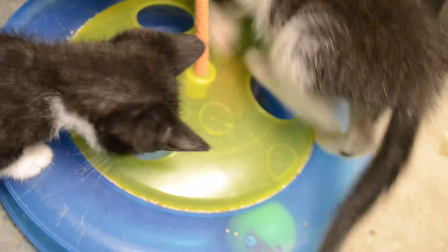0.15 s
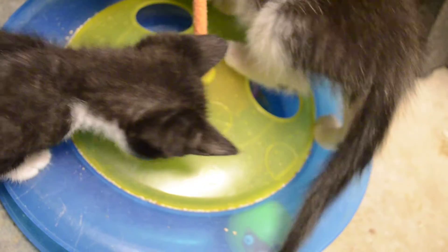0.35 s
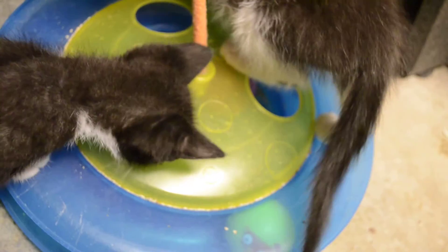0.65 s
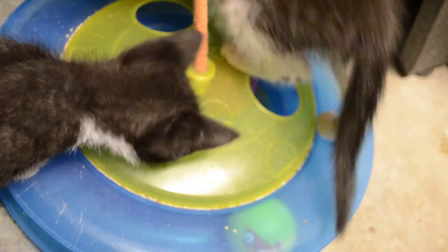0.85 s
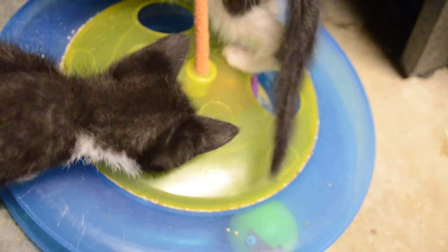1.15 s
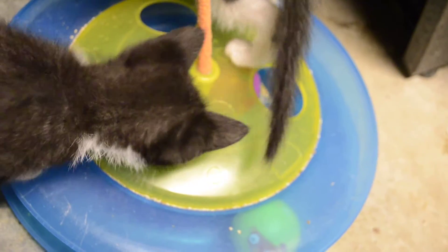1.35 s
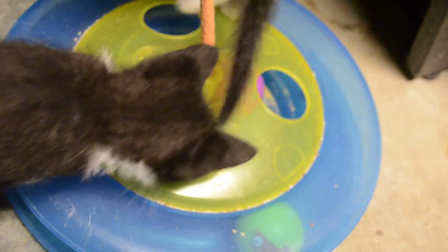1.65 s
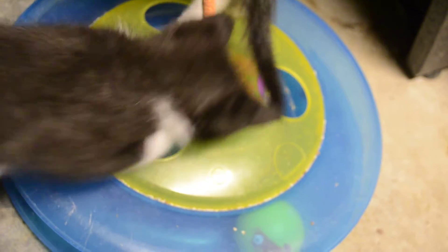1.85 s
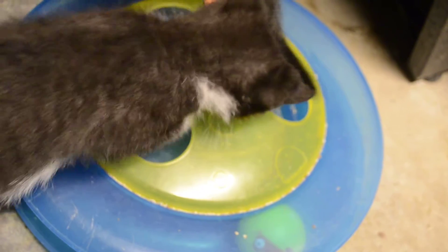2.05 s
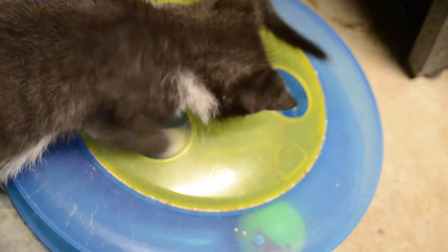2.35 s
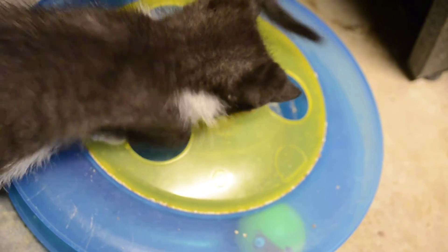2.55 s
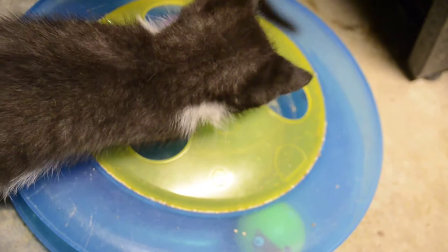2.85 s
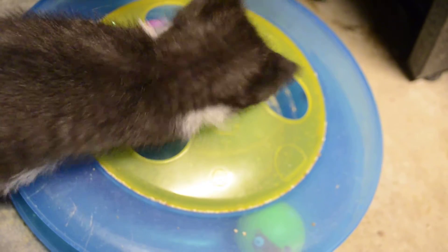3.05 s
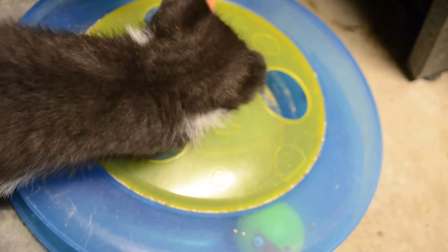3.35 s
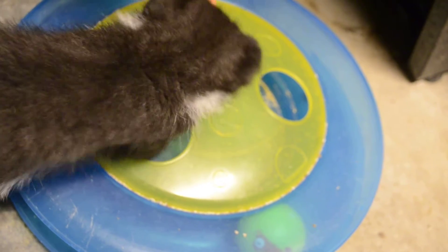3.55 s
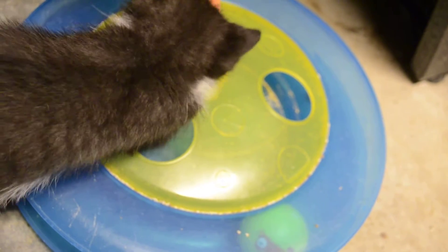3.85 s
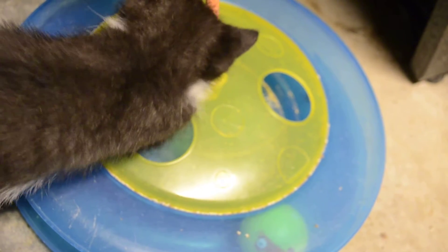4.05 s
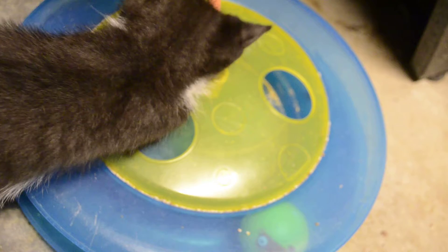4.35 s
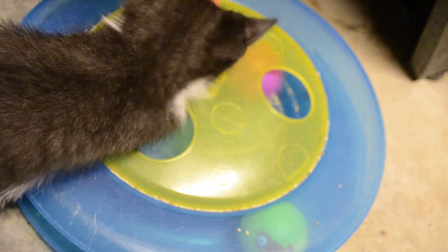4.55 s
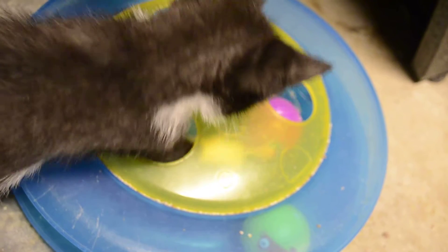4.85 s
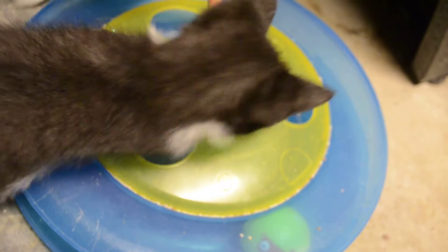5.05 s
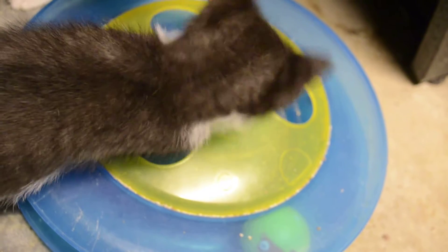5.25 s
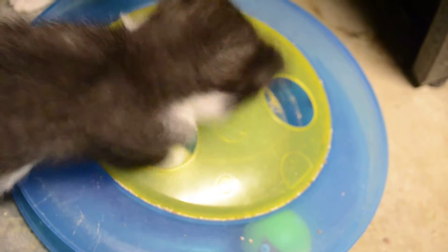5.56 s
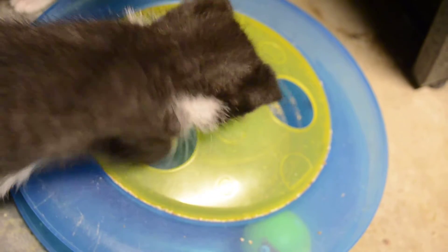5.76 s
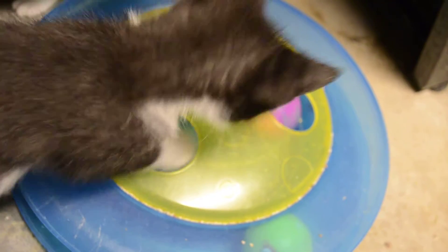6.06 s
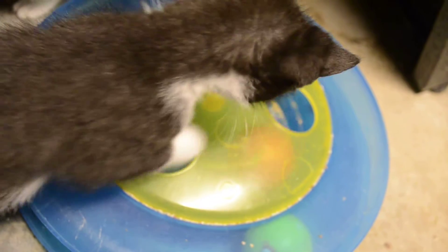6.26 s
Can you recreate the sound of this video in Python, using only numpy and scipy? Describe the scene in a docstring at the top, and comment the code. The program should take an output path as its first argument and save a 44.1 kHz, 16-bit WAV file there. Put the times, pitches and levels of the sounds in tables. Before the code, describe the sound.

A ventilation fan drones steadily throughout, a low hum with soft rushing air in a small room. Close to the microphone, a kitten plays with a ball in a hollow plastic toy. Only one faint tap comes at about 0.4 seconds, then nothing but the fan until light touches near 2.3 seconds. At 2.6 seconds a sharp, bright click and knock stand out, followed by smaller hollow knocks. From 3.2 to 4.1 seconds the ball knocks and chatters unevenly, with a few clicks and tiny judders. Softer taps and short rolls follow. At 5 seconds comes a loud, quick row of clicks and a brief judder as a paw pins the ball. It then rumbles along the track, tapping the walls, clatters again around 5.6 seconds, and rolls on more softly until about 6.4 seconds. Fur occasionally brushes the plastic very faintly.

```python
"""A ball knocks, chatters and rumbles round the track of a hollow plastic toy, batted by a kitten.
Each blow rings the toy's tray and lid; ribs in the track make the rumble, and the ball judders when a
paw pins it. Fur brushes the plastic, and sharp, bright clicks come singly or in quick rows. The toy lies
on the floor of a small room, heard close up on one microphone, with a ventilation fan droning below."""
import sys
import numpy as np
from scipy import signal
from scipy.fft import rfft, irfft
from scipy.io import wavfile

SR = 44100
rng = np.random.default_rng(int(sys.argv[2]) if len(sys.argv) > 2 else 0)


def unload_audio(sound):
    """Save the sound as a 16-bit wav file, at the path given as the first command line argument."""
    columns = np.transpose(np.atleast_2d(sound))
    # keep every value between -1 and 1, then stretch to whole-number steps
    steps = np.round(np.clip(columns, -1, 1) * 32767)
    wavfile.write(sys.argv[1], SR, steps.astype(np.int16))


N = 282844
TIME = np.arange(N) / SR

# Spectrum of the fan's rushing air. Each row: frequency in Hz, relative level in dB.
FAN_AIR = [(25, -36), (42, -23), (58, -10.5), (100, -3.5), (132, -18), (170, -5), (290, -8), (400, -14.5),
           (640, -17.5), (1250, -22.5), (2100, -32), (4000, -44.5), (7500, -61.5), (13000, -69),
           (16000, -65)]
# The fan's drone and faint whistles. Each row: centre in Hz, width in Hz, level in dB.
FAN_TONES = [(91.4, 1.6, -48.5), (205.14, 3.8, -44.5), (234, 6.1, -77), (859.5, 16.6, -53), (944, 4, -60),
             (9850, 650, -87.5), (11770, 620, -84)]
# Fur and paws on the plastic. Each row: middle in seconds, level in dB, half length in seconds.
FUR_BRUSHES = [(2.43, -77, .04), (2.565, -66.5, 0.027), (2.94, -69, 0.018), (3.777, -69, 0.058),
               (4.12, -74, 0.13), (4.992, -66.5, 0.057), (5.598, -67.5, .03), (5.874, -76, .03),
               (6.121, -69, .025)]
# Sharp, bright clicks. Each row: start in seconds, energy per click in dB, burst length in seconds.
SHARP_CLICKS = [(2.268, -41, .006), (2.547, -36, 0), (2.606, -12.5, 0), (2.857, -43, 0),
                (3.4872, -25.5, 0.0036), (3.538, -34, 0), (3.764, -38, 0), (5.021, -22.5, .014),
                (5.597, -25, 0), (5.687, -35, 0), (5.841, -33, 0)]
# Modes of the toy, from hollow tray through lid to stiff rim.
# Each row: frequency in Hz, relative level in dB, time to die away by 60 dB in seconds.
TOY_MODES = [(320, -4, 0.37), (373.6, -2, 0.47), (457.7, 1, 0.17), (499, -2.5, 0.18), (616, 1, 0.018),
             (618.2, 0.5, 0.088), (694, 4, 0.066), (777, 7.5, 0.054), (908, -0.5, 0.11),
             (1005.7, -2, 0.068), (1065.5, -0.5, 0.056), (1130.6, -10, 0.13), (1250, -9.5, 0.14),
             (1440, -16, 0.22), (1462, 0.5, 0.085), (1743, -27, 0.072), (2004, -17.5, 0.044),
             (2196, 6, 0.08), (2230, -17, 0.088), (3000, 4.5, 0.088), (3130, -25.5, 0.24),
             (3760, -28, 0.097), (3630, -8, 0.12)]
# The smooth ball's gentle push as it rolls. Each row: frequency in Hz, gain in dB.
ROLL_SPECTRUM = [(120, -33.5), (280, -9), (500, 2), (800, 0.5), (1450, -3.5), (1800, -8.5), (2300, -13.5),
                 (3500, -24.5), (5000, -49), (12000, -67.5)]
# Runs of the ball along the track. Each row: start in seconds, length in seconds, opening level in dB.
BALL_RUNS = [(2.682, 0.018, -36), (3.0, 0.29, -49), (3.478, 0.11, -46), (4.386, 0.15, -41),
             (4.755, 0.069, -36.5), (5.05, 0.16, -32.5), (5.24, 0.237, -31.5), (5.63, 0.79, -36.5)]
# The pinned ball juddering. Each row: start in seconds, wall pitch in Hz, level in dB, length in seconds.
BALL_JUDDERS = [(3.239, 1090, -24, 0.015), (3.489, 620, -22, 0.0071), (5.022, 612, -10, 0.016),
                (5.026, 1348, -23, 0.016), (5.064, 618, -22, 0.01), (5.596, 1062, -15.5, 0.01),
                (5.628, 1030, -14.5, 0.0087)]
# The push of a blow on soft plastic. Each row: frequency in Hz, gain in dB.
BLOW_SPECTRUM = [(70, -27.5), (380, -5), (520, -1.5), (640, 3.5), (850, -1), (1070, 4.5), (1480, 1),
                 (1750, -9.5), (2250, -6.5), (2650, -16.5), (3700, -18), (4500, -26), (12500, -42),
                 (16000, -47)]
# The four bands of a blow: tray, lid, crack, edge tick. Each row: low edge in Hz, high edge in Hz.
BLOW_BANDS = [(330, 780), (780, 1800), (1800, 5000), (5000, 15000)]
# The core of each of those bands, where its gain is flat. Each row: low edge in Hz, high edge in Hz.
BAND_CORES = [(370, 607), (900, 1310), (2050, 2970), (6000, 13000)]
# Blows of ball and paw. Each row: start in seconds, lid level in dB, tray and crack levels in dB
# relative to the lid, favoured tray and lid pitches in Hz, chatter length in seconds.
TOY_KNOCKS = [(0.357, -36, 5.5, -16, 500, 1300, 0.00395), (2.393, -38.5, -1, -13, 490, 1260, 0.0039),
              (2.6057, -15, -1.5, -10, 617, 1225, 0.00066), (2.656, -27.5, 3, -12, 614, 1090, 0.0034),
              (2.6812, -27.5, 4.5, -6, 500, 1030, 0.004), (2.883, -23.5, -4.5, -17.5, 490, 1340, 0.0052),
              (2.962, -27, -2.5, -17, 497, 910, 0.002), (3.188, -36.5, 10.5, -14, 500, 1000, .016),
              (3.2405, -26, 1.5, -19.5, 746, 1090, .011), (3.4042, -30.5, 8.5, -9, 500, 1030, .007),
              (3.4565, -24.5, -4, -18, 640, 1090, .008), (3.484, -20, 0.5, -15, 624, 960, 0.0033),
              (3.5383, -26, 5, -7.5, 510, 1000, 0.0076), (3.6278, -19, -4, -14, 703, 1150, 0.0061),
              (3.658, -31, 7.5, -6, 495, 1020, 0.0019), (3.7834, -23, -5, -16.5, 650, 970, 0.0055),
              (3.9972, -37, 10, -14, 470, 1050, 0.0011), (4.0718, -26, -5.5, -16, 750, 910, 0.0033),
              (4.207, -39.5, 5, -19, 530, 830, 0.0038), (4.3543, -29, 8, -6, 544, 1004, 0.0033),
              (4.475, -32, 3, -16.5, 574, 1053, 0.0035), (4.49, -34, 4.5, -9, 457, 975, 0.0031),
              (4.649, -41, 12.5, -14.5, 670, 855, 0.015), (4.774, -39, 4.5, -14, 606, 1190, 0.013),
              (4.826, -40, 8.5, -12.5, 490, 1100, 0.017), (5.021, -17.5, -6, -10, 610, 1400, .013),
              (5.0626, -29, 1, -14, 600, 1030, 0.0085), (5.096, -33.5, 0, -12.5, 472, 1000, .003),
              (5.206, -34.5, 8, -27, 480, 900, .003), (5.227, -32, 3.5, -8.5, 570, 974, .008),
              (5.34, -32, 9, -12.5, 490, 1085, .009), (5.397, -35, -4, -11, 510, 910, .008),
              (5.418, -37.5, 7.5, -24, 445, 1080, .007), (5.5748, -30, -6, -11.5, 760, 979, 0.014),
              (5.593, -26, -0.5, -12.5, 614, 1090, .008), (5.63, -23, -2.5, -13.5, 586.4, 1090, 0.0072),
              (5.655, -31, 4, -9.5, 693, 920, 0.0037), (5.68, -26.5, 1.5, -16, 690, 950, .008),
              (5.763, -32, 3, -20, 670, 810, 0.00291), (5.781, -37, 9, -10, 450, 1040, 0.0024),
              (5.85, -34.5, -3, -13, 634, 1090, 0.0032), (5.894, -36, 5.5, -9.5, 454, 1050, 0.0037),
              (5.994, -37.5, 5, -9.5, 500, 1050, .018), (6.0413, -34, 11.5, -14, 570.6, 816, 0.0088),
              (6.166, -41, 11, -9, 467, 1000, .016), (6.281, -40, 0, -25, 680, 978, 0.0032),
              (6.392, -30, 1, -19.5, 560, 980, 0.0036)]


def undb(db):
    """Decibels to gain."""
    return 10 ** (np.asarray(db) / 20)


def unit(x):
    """Scale to rms 1."""
    return x / np.sqrt(np.mean(x ** 2))


def with_energy(x, db):
    """Scale a short sound to a total energy in dB."""
    return x * undb(db) / np.sqrt(np.sum(x ** 2))


def fade(t, t60):
    """Exponential ring-down, 60 dB in t60 seconds."""
    return np.exp(-np.log(1000) * t / t60)


def add(track, start_s, x):
    """Mix a short sound into the track."""
    i = int(start_s * SR)
    track[i:i + len(x)] += x[:max(N - i, 0)]


def bandpass(x, edges_hz, order):
    """Causal band-pass."""
    return signal.sosfilt(signal.butter(order, edges_hz, "bandpass", fs=SR, output="sos"), x)


def lowpass(x, corner_hz):
    """Gentle causal low-pass."""
    return signal.sosfilt(signal.butter(1, corner_hz, fs=SR, output="sos"), x)


def colour(x, hz, db):
    """Minimum-phase filter through (Hz, dB) points, so that attacks stay sharp."""
    f = np.fft.rfftfreq(len(x), 1 / SR)
    gain = undb(np.interp(np.log(np.maximum(f, 1)), np.log(hz), db))
    cepstrum = irfft(np.log(gain))
    cepstrum[1:len(x) // 2] *= 2
    cepstrum[len(x) // 2 + 1:] = 0
    return irfft(rfft(x) * np.exp(rfft(cepstrum)))


def noise(gain):
    """Steady noise of rms 1 whose spectrum is the function gain(Hz)."""
    f = np.fft.rfftfreq(N, 1 / SR) + 1e-3
    return unit(irfft(rfft(rng.standard_normal(N)) * gain(f), N))


def resonance(centre_hz, width_hz):
    """Wavering tone of rms 1: a narrow resonance driven by noise."""
    return noise(lambda f: 1 / (1 + (0.93 * (f - centre_hz) / width_hz) ** 2))


def fan(air_db=-39):
    """The room tone: a fan's rushing air with a few narrow, wavering resonances."""
    hz, db = np.transpose(FAN_AIR)
    air = undb(air_db) * noise(lambda f: undb(np.interp(np.log(f), np.log(hz), db)))
    return air + sum(undb(level) * resonance(centre, width) for centre, width, level in FAN_TONES)


def room(x, wet_db=-10, low_t60=0.33, treble_t60=0.37, treble_db=-4, split_hz=3500):
    """A small furnished room: the direct sound, then short, diffuse echoes with softened treble."""
    t = np.arange(SR // 2) / SR
    grain = rng.standard_normal(len(t))
    low = signal.sosfiltfilt(signal.butter(2, split_hz, fs=SR, output="sos"), grain)
    treble = undb(treble_db) * (grain - low)
    build_up = 1 - np.exp(-(t / 0.011) ** 2)
    tail = build_up * (low * fade(t, low_t60) + treble * fade(t, treble_t60))
    tail /= np.sqrt(np.sum(fade(t, low_t60) ** 2))
    return x + undb(wet_db) * signal.fftconvolve(x, tail)[:N]


def fur(grip_spread_db=3, catches_per_s=600):
    """Soft, scratchy swishes: tufts of fur catch and slip hundreds of times a second."""
    swell = sum(undb(db) * np.exp(-((TIME - middle) / half) ** 2) for middle, db, half in FUR_BRUSHES)
    grip_db = grip_spread_db * rng.standard_normal(N)[(TIME * catches_per_s).astype(int)]
    hairs = rng.standard_normal(N) * undb(grip_db)
    return swell * unit(bandpass(hairs, (4000, 13500), order=2))


def clicks(clicks_per_s=250, click_t60=0.0081, tail_t60=0.045, tail_db=-25):
    """Sharp, bright clicks, single or in quick rows."""
    out, t = np.zeros(N), np.arange(SR // 20) / SR
    decay = fade(t, click_t60) + undb(tail_db) * fade(t, tail_t60)
    for start, db, burst_s in SHARP_CLICKS:
        for k in range(1 + int(burst_s * clicks_per_s)):
            click = bandpass(rng.standard_normal(len(t)) * decay, (2500, 6500), order=1)
            add(out, start + k / clicks_per_s, with_energy(click, db))
    return out


def toy_ring(t, favoured=(), reach=0.084, scatter_db=2, detune=0.012):
    """Ring of the toy after one touch; the struck spot favours modes near each (Hz, strength)."""
    hz, db, t60 = np.transpose(TOY_MODES)
    size, tune = rng.standard_normal((2, len(hz)))
    favour = 1 + sum(strength * np.exp(-(np.log(hz / f) / reach) ** 2) for f, strength in favoured)
    gain = undb(db + scatter_db * size) * favour * rng.choice([-1, 1], len(hz))
    modes = np.sin(2 * np.pi * np.outer(hz * (1 + detune * tune), t))
    return gain @ (modes * fade(t, t60[:, None]))


def roll_gain(t, attack_s=0.013, sag_db_per_s=-7.5, stop_t60=0.35):
    """Each run picks up quickly, loses level to friction and dies away when the ball is stopped."""
    gain = 0
    for start, length, db in BALL_RUNS:
        age = np.maximum(t - start, 0)
        rise = np.minimum(age / attack_s, 1)
        stop = fade(np.maximum(age - length, 0), stop_t60)
        gain += rise * undb(db + sag_db_per_s * age) * stop
    return gain


def rolling(bumps_per_s=700, spread_db=7, hum_db=-2, timbres=6):
    """The track's ribs make a stream of small bumps under the ball, and the air under the lid hums."""
    rumble, t = np.zeros(N), np.arange(2 ** 13) / SR
    for _ in range(timbres):
        hits = rng.random(N) < bumps_per_s / timbres / SR
        bumps = hits * undb(spread_db * rng.standard_normal(N))
        ring = with_energy(toy_ring(t), db=-9)
        grit = with_energy(rng.standard_normal(len(t)) * fade(t, t60=0.025), db=-1)
        bump_sound = colour(ring + grit, *np.transpose(ROLL_SPECTRUM))
        rumble += signal.oaconvolve(bumps, bump_sound)[:N]
    hum = undb(hum_db) * resonance(centre_hz=508, width_hz=16)
    return unit(unit(rumble) + hum) * roll_gain(TIME)


def judders(waver=0.07, overtone_db=-19):
    """Pinned by a paw, the ball sticks and slips at the wall's own pitch until it comes free."""
    out, t = np.zeros(N), np.arange(SR // 20) / SR
    for start, hz, db, length in BALL_JUDDERS:
        wobble = unit(lowpass(rng.standard_normal(len(t)), corner_hz=400))
        phase = 2 * np.pi * np.cumsum(hz * (1 + waver * wobble)) / SR
        tone = np.sqrt(2) * (np.sin(phase) + undb(overtone_db) * np.sin(2 * phase))
        swell = np.sqrt(np.abs(np.sin(np.pi * np.minimum(t / length, 1))))
        add(out, start, undb(db) * swell * tone)
    return out


def chatter(x, length_s, rebound=0.79, full_s=0.019, touches=3):
    """The light ball touches a few more times before it leaves the wall; long contacts rebound harder."""
    out = x.copy()
    strength = rebound * min(length_s / full_s, 1)
    for k, (when, size) in enumerate(rng.random((touches, 2))):
        lag = 1 + int(length_s * SR * (k + when) / touches)
        out[lag:] += strength * (0.5 + size) * x[:-lag]
    return out


def band_levels(x, spread_s=0.025):
    """Level in dB of each band of a blow, as if its energy were spread over spread_s."""
    f = np.fft.rfftfreq(len(x), 1 / SR)
    power = 2 * np.abs(rfft(x)) ** 2 / len(x) / (spread_s * SR)
    return 10 * np.log10([power[(f >= low) & (f < high)].sum() for low, high in BLOW_BANDS])


def blow(lid_db, tray_db, crack_db, tray_hz, lid_hz, chatter_s):
    """One blow: a snap at the contact, dense quick flexing of the thin walls, and the toy's ring."""
    t = np.arange(2 ** 13) / SR
    grain = rng.standard_normal((2, len(t)))
    snap = with_energy(grain[0] * fade(t, t60=0.0071), db=-4.5)
    flex = with_energy(grain[1] * fade(t, t60=0.076), db=1)
    ring = with_energy(toy_ring(t, favoured=[(tray_hz, 2.6), (lid_hz, 5.0)]), db=-10)
    touch = snap + lowpass(flex, corner_hz=6000) + ring
    hit = colour(chatter(touch, chatter_s), *np.transpose(BLOW_SPECTRUM))
    edge_db = -33.5 + 0.38 * crack_db  # the harder the crack, the stronger the edge tick
    # where and how hard the ball lands decides each band's share
    gain_db = lid_db + np.array([tray_db, 0, crack_db, edge_db]) - band_levels(hit)
    return colour(hit, np.ravel(BAND_CORES), np.repeat(gain_db, 2))


def tap(lid_db):
    """A light, hollow touch of the ball on the tray."""
    return blow(lid_db, tray_db=7, crack_db=-18, tray_hz=505, lid_hz=1000, chatter_s=0.004)


def wall_taps(taps_per_s=20, re_roll_db=-6.5, scatter_db=2.5, unevenness=0.7):
    """The ball wanders from wall to wall during a run, tapping as hard as it rolls."""
    out = np.zeros(N)
    for start, length, _ in BALL_RUNS:
        for k in range(1, int(length * taps_per_s) + 1):
            when = start + (k - unevenness * rng.random()) / taps_per_s
            add(out, when, roll_gain(when) * tap(re_roll_db + scatter_db * rng.standard_normal()))
    return out


def knocks(drop_s=0.025, drop_scatter=0.199):
    """Ball and paw strike the toy; after each blow the ball drops back into the tray."""
    out = np.zeros(N)
    for start, lid_db, *timbre in TOY_KNOCKS:
        add(out, start, blow(lid_db, *timbre))
        delay = drop_s * (1 + drop_scatter * rng.uniform(-0.993, 1))
        add(out, start + delay, tap(-26.5 + 0.55 * lid_db))  # a harder blow, a louder drop
    return out


def scene():
    """The toy on the floor of the room, over the fan, in mono."""
    room_tone = fan()
    close_sounds = rolling() + fur() + judders() + knocks() + clicks() + wall_taps()
    return (room_tone + room(close_sounds))[None]


def record(dry, top_hz=15500):
    """One close microphone; the recorder clips at full scale and cuts the top treble steeply."""
    top_cut = signal.ellip(8, 0.2, 70, top_hz, fs=SR, output="sos")
    return signal.sosfilt(top_cut, np.clip(dry, -1, 1))


dry = scene()
out = record(dry)
unload_audio(out)
```